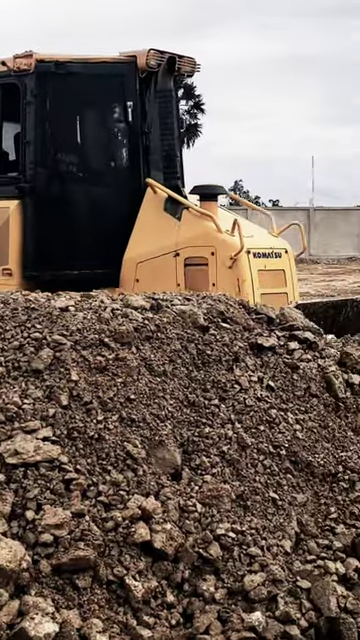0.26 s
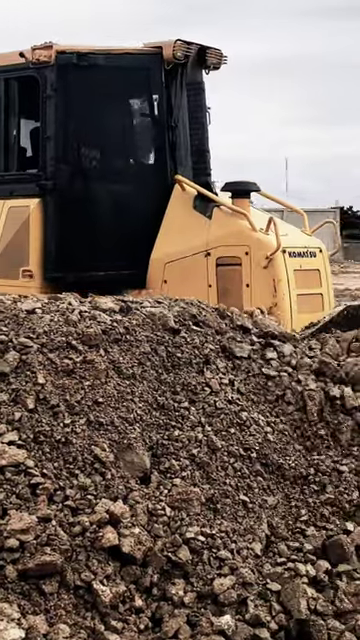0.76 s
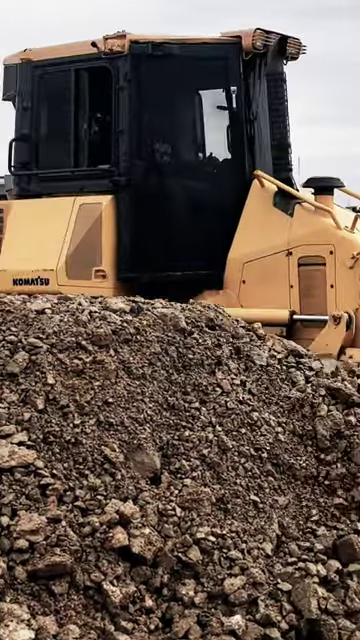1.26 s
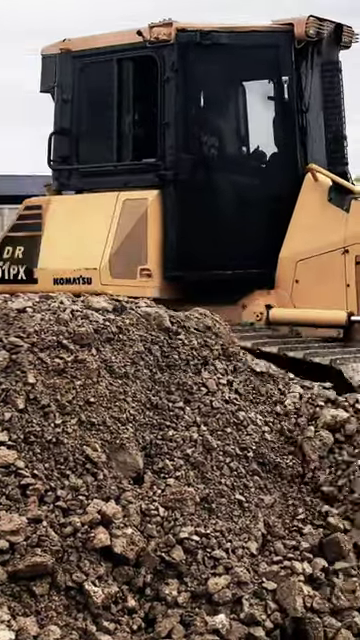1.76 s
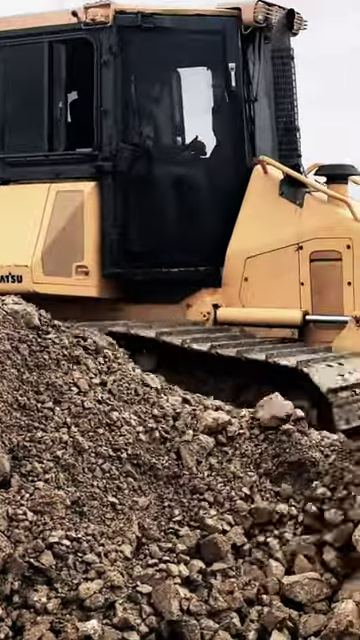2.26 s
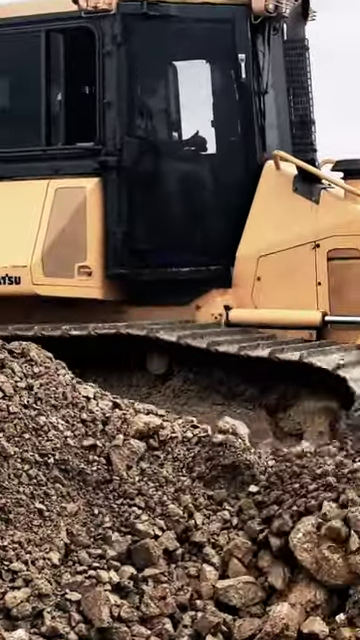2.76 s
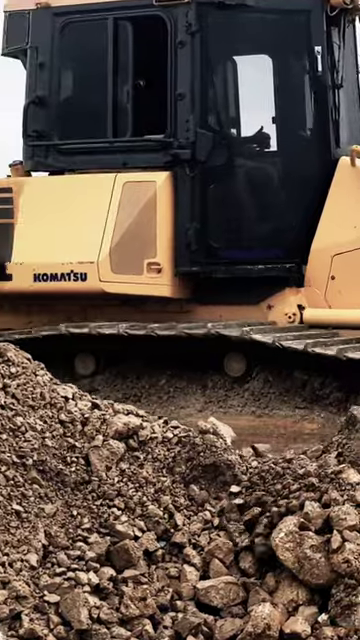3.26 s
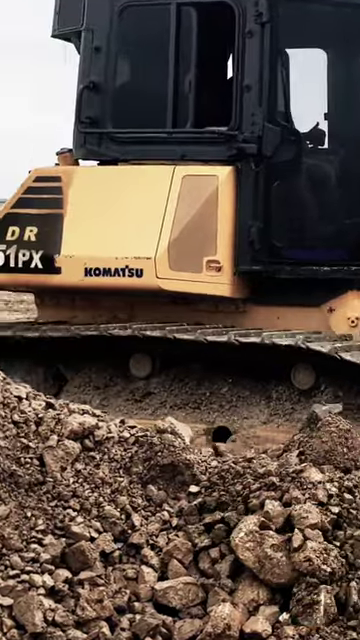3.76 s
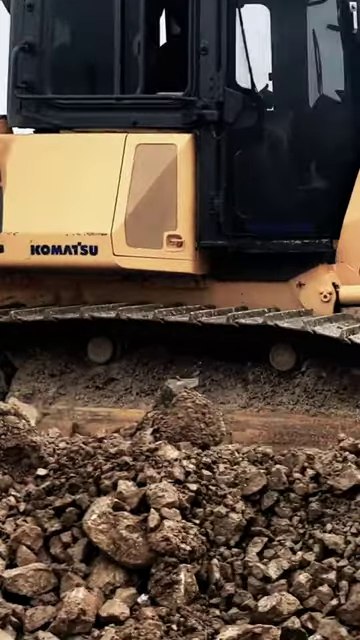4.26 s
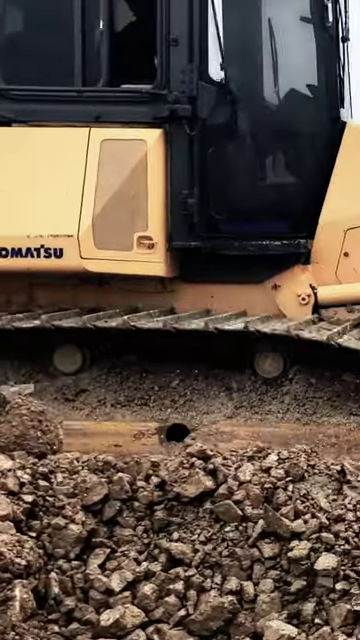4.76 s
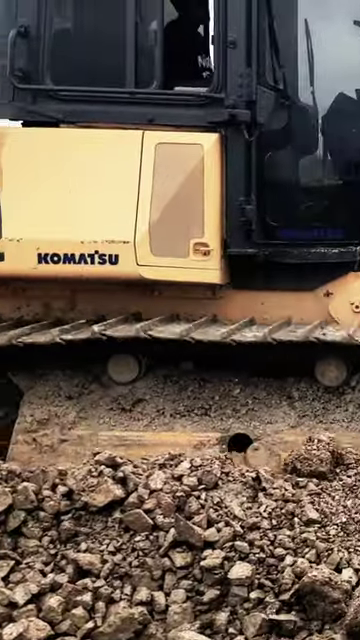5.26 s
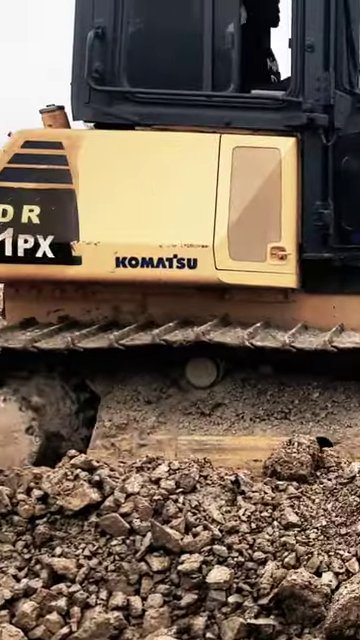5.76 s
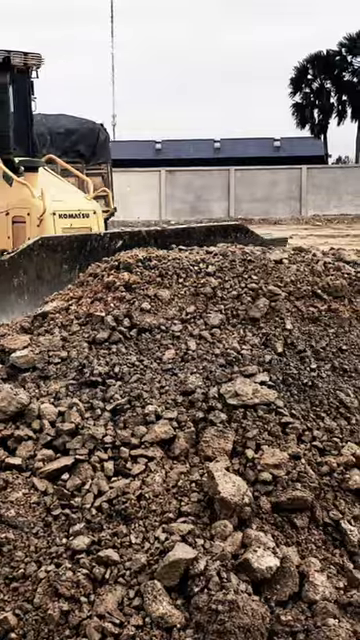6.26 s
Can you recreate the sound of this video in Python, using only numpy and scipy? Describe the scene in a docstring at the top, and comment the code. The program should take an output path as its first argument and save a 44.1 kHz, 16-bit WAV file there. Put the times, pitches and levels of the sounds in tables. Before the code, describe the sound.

Outdoors on open ground, a crawler bulldozer works close to a phone's stereo microphones. Its diesel holds a low, buzzing drone over roaring exhaust and soil noise, with metallic clatter and rattle swelling as it passes. Clods thud early, track pins give brief high squeaks in the middle, and harder knocks come later. Near the end the engine sags sharply, stumbles, then revs back up. A second engine hums faintly further off.

```python
"""Open ground: a crawler bulldozer pushes rock and soil close to a phone with two microphone ports.
Its six-cylinder diesel drones as a few harmonic lines, bogs down near the end and picks up again; coloured
noise gives roar, clatter, rattle and hiss. A turbocharger whistles thinly as a gliding sine, dry track pins
squeak as short fading tones, links knock as noise bursts through resonances, and clods rumble as decaying notes
with puffs of noise. A second engine drones further off."""
import sys
import numpy as np
from scipy import signal
from scipy.fft import rfft, irfft, next_fast_len
from scipy.io import wavfile
from scipy.ndimage import uniform_filter1d, map_coordinates

SR = 44100
rng = np.random.default_rng(int(sys.argv[2]) if len(sys.argv) > 2 else 0)


def magnitude_from_level(level_db):
    """Linear magnitude for a level in decibels (20 dB per decade)."""
    exponent = np.asarray(level_db, float) / 20
    return 10 ** exponent


def wrap_up_sound(samples):
    """Save the sound to the file named by the first command line argument, as 16-bit audio."""
    columns = np.atleast_2d(samples).T
    # keep every value between -1 and 1, then stretch to whole-number steps
    tamed = np.clip(columns, -1, 1)
    steps = np.round(tamed * 32767).astype(np.int16)
    wavfile.write(sys.argv[1], SR, steps)


N = 287973  # length [samples]


def unit(x):
    """Normalization: scales to rms 1."""
    return x / np.sqrt(np.mean(x ** 2) + 1e-20)


def along(points, hz):
    """Log-frequency interpolation of (frequency [Hz], value) points."""
    f, v = np.transpose(points)
    return np.interp(np.log(hz + 1), np.log(f + 1), v)


def curves(rows):
    """Linear interpolation in time: one value per sample for each column after the time."""
    s, *cols = np.transpose(rows)
    return [np.interp(np.arange(N) / SR, s, c) for c in cols]


def wobble(rate):
    """Band-limited fluctuation: a smooth random curve with rate knots a second."""
    return map_coordinates(rng.standard_normal(N // 20), [np.arange(N) * rate / SR], mode="wrap")


def filtered(x, response):
    """Linear filtering: the spectrum of x times a complex response of frequency."""
    m = next_fast_len(x.shape[-1] + 8192)
    spectrum = rfft(x, m) * response(np.fft.rfftfreq(m, 1 / SR))
    return irfft(spectrum, m)[..., :x.shape[-1]]


def mode(f, hz, width_hz):
    """Damped resonance: the response of one second-order mode, 1 at its peak."""
    return 1j * f * width_hz / (hz * hz - f * f + 1j * f * width_hz)


def turns(hz):
    """Phase [rad] as the running integral of a moving frequency."""
    return 2 * np.pi * np.cumsum(hz) / SR


def rush(spectrum, patchy_db, gate=1):
    """Partly coherent stereo noise: mid of rms 1, with patches of random gain, gated before its colour."""
    # left-right coherence: (frequency [Hz], likeness [0 to 1])
    likeness = [(30, 0.74), (60, 0.6), (110, 0.81), (200, 0.74), (380, 0.75), (700, 0.9), (1300, 0.88),
                (2400, 0.4), (4400, 0.11), (15000, .02)]
    z = signal.stft(rng.standard_normal((2, N + 512)), nperseg=512)[2]
    field = uniform_filter1d(rng.standard_normal(z.shape[1:]), size=6, axis=0)
    field = uniform_filter1d(field, size=8, axis=1)
    patchy = signal.istft(z * magnitude_from_level(patchy_db * unit(field)), nperseg=512)[1][:, :N]

    def colour(hz):
        angle = np.arccos(np.clip(along(likeness, hz), 0, 1)) / 2  # splits the power between mid and side
        return magnitude_from_level(along(spectrum, hz)) * [np.cos(angle), np.sin(angle)]

    mid, side = filtered(gate * patchy, colour)
    return np.array([mid + side, mid - side]) / np.std(mid)


def echoed(x):
    """Discrete reflections: a few echoes, each arriving a little differently at the two ports."""
    # echoes off ground and heap: (nominal delay [s], level against the direct sound [dB])
    walls = [(.004, -9), (.011, -7.5), (.019, -26), (.031, -21.5)]
    skew = rng.uniform(.8, 1.2, (2, len(walls)))

    def paths(f):
        echoes = [magnitude_from_level(db) * np.exp(-2j * np.pi * f * s * skew[:, k:k + 1]) for k, (s, db) in enumerate(walls)]
        return 1 + sum(echoes)

    return filtered(x, paths)


def second_drone():
    """Periodic firing further off: a fainter tone and octave that keep their own speed."""
    # second engine, unevenly fading: (time [s], tone rms level before the left-right balance [dB])
    distant = [(0, -33), (1.2, -44.5), (1.9, -34), (3.7, -41), (4.7, -44), (6.53, -52)]
    tone_db, = curves(distant)
    firing = turns(79.93 + 1.498 * wobble(1.4) + 0.71 * wobble(11))  # Hz
    tone = magnitude_from_level(tone_db + 1.1 * wobble(7)) * np.sin(firing)
    octave = magnitude_from_level(tone_db - 3 + 1.8 * wobble(12)) * np.sin(2 * firing)
    return np.sqrt(2) * (tone + octave)


def thumps():
    """Impact on soft ground: each clod lands with a short dull note of its own pitch, in a puff of grit."""
    # clods falling: (time [s], note level before its rise and decay [dB], pitch [Hz])
    clods = [(0.976, -22.5, 223), (1.009, -22.5, 298), (1.043, -26, 263), (1.123, -18, 258),
             (1.176, -26.5, 434), (1.202, -22, 320), (2.387, -21.5, 244), (4.435, -21.5, 316),
             (4.47, -47, 250), (4.564, -15, 238), (4.594, -26.5, 241), (5.619, -28, 278),
             (6.49, -25.5, 330)]
    grit_db = 9  # the puff over the note, before its narrow colour
    t = np.arange(SR // 10) / SR
    notes, grit = np.zeros((2, N + SR))
    for s, db, hz in clods:
        at = slice(round(s * SR), round(s * SR) + len(t))
        note_swell = magnitude_from_level(db - 60 * t / 0.11) * (1 - np.exp(-t / 0.0062))
        notes[at] += note_swell * np.sin(2 * np.pi * hz * t)
        grit_swell = magnitude_from_level(db + grit_db - 60 * t / 0.12) * (1 - np.exp(-t / 0.0019))
        grit[at] += grit_swell * rng.standard_normal(len(t))
    return notes[:N] + filtered(grit[:N], lambda f: mode(f, 300, 300) ** 2)


def knocks():
    """Impulsive excitation of modes: each blow rings the links, with a dull thud below and a sharp tick above."""
    # link and stone knocks, levels before envelopes and filters:
    # (time [s], ring level [dB], thud level [dB], tick level [dB])
    blows = [(0.2432, -38, -43, -52), (1.1754, -35, -33, -43.5), (1.3795, -21.5, -29, -35),
             (2.386, -25.5, -31, -43.5), (4.5077, -28, -27.5, -53), (4.8434, -53, -28, -60),
             (4.8714, -28, -21.5, -48), (4.9174, -39, -23.5, -41), (5.2523, -17, -24, -31),
             (5.5228, -19, -25.5, -33), (5.671, -29, -35, -35), (5.8818, -39, -39, -31),
             (5.9386, -50, -62, -33), (6.3824, -36, -33.5, -48)]
    # modes of the track links: (frequency [Hz], width [Hz], gain [dB])
    link_modes = [(1440, 250, 4), (2470, 79, -2), (2880, 530, -8)]
    t = np.arange(SR // 8) / SR
    ring, thud, tick = np.zeros((3, N + SR))
    for s, ring_db, thud_db, tick_db in blows:
        burst = rng.standard_normal((2, len(t)))
        at = slice(round(s * SR), round(s * SR) + len(t))
        ring[at] += magnitude_from_level(ring_db - 60 * t / 0.04) * (1 - np.exp(-t / 0.0013)) * burst[0]
        thud_hz = 760 * rng.uniform(0.94, 1.077)
        thud[at] += magnitude_from_level(thud_db - 60 * t / 0.026) * np.sin(2 * np.pi * thud_hz * t)
        tick[at] += magnitude_from_level(tick_db - 60 * t / 0.035) * burst[1]

    def links(f):  # neighbouring modes alternate in sign
        return sum((-1) ** k * magnitude_from_level(db) * mode(f, hz, w) for k, (hz, w, db) in enumerate(link_modes))

    steel = filtered(ring[:N], links) + filtered(tick[:N], lambda f: mode(f, 5600, 3400) ** 2)
    # little steel ring survives above 6300 Hz
    return thud[:N] + filtered(steel, lambda f: 1 / (1 + (f / 6300) ** 10))


def squeaks():
    """Stick-slip locked to one steel mode: a wavering, scratchy tone with its octave."""
    # squeaks of track pins and rollers: (start [s], length [s], mid pitch [Hz],
    # tone level at the start, before fade and flutter [dB], octave against the tone [dB])
    slips = [(2.114, .023, 6360, -33, -13), (2.584, .026, 6120, -42, -13), (2.723, .045, 6420, -24, -15),
             (2.77, .03, 6450, -40, -10), (2.869, .045, 6280, -35, -16), (3.08, .069, 6430, -29, -13),
             (3.115, .05, 1635, -43, -40), (3.221, .077, 1730, -42, -40), (3.343, .028, 6250, -47, -10),
             (3.431, .085, 4680, -40, -33), (3.568, .08, 5440, -39, -25), (3.74, .056, 2380, -49, -40),
             (3.785, .028, 4640, -47, -23), (3.812, .06, 2275, -45, -40), (3.82, .089, 5160, -50, -25),
             (3.924, .04, 6090, -35, -15), (3.991, .085, 5150, -52, -22), (4.045, .05, 2430, -50, -40),
             (4.05, .03, 6260, -54, -12), (4.918, .079, 6150, -35, -26), (4.93, .13, 4650, -54, -20),
             (5.02, .088, 6190, -53, -14), (5.07, .042, 4570, -48, -28), (5.339, .065, 4650, -54, -20),
             (5.387, .023, 6330, -32, -11), (5.41, .04, 6210, -34, -7), (5.45, .079, 6360, -33, -6),
             (5.465, .033, 4770, -38, -40), (5.511, .045, 4610, -48, -36), (5.54, .019, 6375, -30, -8),
             (5.571, .059, 6400, -30, -8), (5.59, .087, 4675, -54, -24), (5.703, .066, 6220, -41, -8),
             (5.785, .083, 6220, -36, -9), (5.89, .073, 6225, -54, -14), (6.361, .086, 6285, -48, -18)]
    # glide by pitch: (pitch [Hz], glide [Hz per s of listed length])
    glide = [(4700, -700), (5400, 0), (6300, 700)]
    fade_db_per_s = 57.5
    out = np.zeros(N)
    waver_hz = 32 * wobble(170) + 28 * wobble(35)
    flutter_db = 2.4 * wobble(60) + 1.8 * wobble(200)
    scratch = 1 + .14 * wobble(900)
    for start, length, hz, db, under_db in slips:
        end, octave_db = start + length, db + under_db
        i = np.arange(round((start - .006) * SR), round((end + 0.0013) * SR))
        sweep_s = np.linspace(-length / 2, length / 2, len(i))
        phase = turns(hz + along(glide, hz) * sweep_s + waver_hz[i])
        edge = signal.windows.tukey(len(i), 0.024 / (end - start + 0.012))
        fade = magnitude_from_level(-fade_db_per_s * (i / SR - start))
        tone = magnitude_from_level(db + flutter_db[i]) * np.sin(phase)
        octave = magnitude_from_level(octave_db + 1.36 * flutter_db[i]) * np.sin(2 * phase)
        out[i] += edge * fade * (tone + octave)
    return scratch * out


def turbo():
    """Tonal whistle: one thin sine, slightly unsteady in pitch and level."""
    # turbocharger: (time [s], frequency [Hz], peak level before wobble and echoes [dB])
    whistle = [(0, 11100, -74), (.7, 12050, -65), (2, 12750, -66), (2.5, 12980, -59), (3.15, 13030, -61),
               (3.9, 12550, -69), (4.5, 12300, -76), (5.6, 12300, -76), (6.53, 12800, -70)]
    hz, db = curves(whistle)
    return magnitude_from_level(db + 2 * wobble(20)) * np.sin(turns(hz + 8 * wobble(40)))


def air_hiss(rattle_db):
    """Broadband noise: air hiss that grows 1.2 dB per dB of rattle."""
    # colour of the hiss: (frequency [Hz], relative level [dB])
    hiss_colour = [(3820, -24.5), (6500, -24), (7770, -9), (8330, -10.5), (10300, -14.5), (11200, -5),
                   (12400, 2), (13900, 0), (15500, -4)]
    level_db = -57.5 + 1.2 * (rattle_db - rattle_db.mean())
    return magnitude_from_level(level_db + .9 * wobble(12)) * rush(hiss_colour, patchy_db=.4)


def roar(clatter_db):
    """Low broadband noise of exhaust and soil: it grows 0.25 dB per dB of clatter."""
    # colour of the roar: (frequency [Hz], relative level [dB])
    roar_colour = [(12, -58.5), (20, -35), (48, -14), (85, -10), (122, -11.5), (146, -8.5), (220, -14.5),
                   (250, -15.5), (310, -16.5), (405, -22.5), (520, -34.5), (800, -60)]
    # soil slides off the blade and swells the roar: (time [s], swell [dB])
    slides = [(1.14, 4), (3.9, 1), (4.52, 2.5), (6.53, 2)]
    swell_s = 0.22  # half width
    level_db = -34 + 0.25 * (clatter_db - clatter_db.mean())
    for s, db in slides:
        level_db = level_db + db * np.exp(-((np.arange(N) / SR - s) / swell_s) ** 2)
    return magnitude_from_level(level_db + 1.5 * wobble(8)) * rush(roar_colour, patchy_db=1)


def shaken_metal(firing, clatter_db, rattle_db):
    """Amplitude modulation: each firing shakes the block, so clatter and rattle pulse on the beat."""
    # colours: (frequency [Hz], relative level [dB])
    clatter_colour, rattle_colour = [(250, -27.5), (430, -7), (522, -4), (632, 0), (767, -0.5), (878, -3.5),
                                     (1030, -14), (1500, -8), (1670, -12.5), (2000, -28.5), (2600, -40),
                                     (4400, -120)], [(1120, -26.5), (1900, -0.5), (2550, -3), (2820, -0.5),
                                                      (3240, -5), (3570, -3), (3900, -4.5), (5790, -5),
                                                      (7500, -16.5), (9750, -45.5), (16500, -120)]
    beat = 1 + 0.064 * np.cos(firing + 0.76) * (1 + 0.39 * wobble(40))
    shake_db = 0.41 * wobble(14)  # shared by both
    clatter_gain = magnitude_from_level(clatter_db + shake_db + 0.77 * wobble(35))
    rattle_gain = magnitude_from_level(rattle_db + 0.91 * shake_db + 0.87 * wobble(16))
    clatter = clatter_gain * rush(clatter_colour, patchy_db=1.2, gate=beat)
    return clatter + rattle_gain * rush(rattle_colour, patchy_db=1.35, gate=beat)


def firing_drone(firing, tone_db, octave_db, ragged):
    """Harmonic series of the cycle: strong firing lines, weaker lines between from unequal cylinders."""
    # unequal cylinders: (multiple of the cycle rate, rms level while the firing tone is at -17 dB [dB])
    uneven = [(4, -48), (5, -48), (7, -39), (8, -47.5), (9, -39), (11, -42.5), (18, -48)]
    drone = magnitude_from_level(tone_db + (0.6 + 1.7 * ragged) * wobble(25)) * np.sin(firing)
    drone = drone + magnitude_from_level(octave_db + (1.5 + 2 * ragged) * wobble(25)) * np.sin(2 * firing - np.pi / 5)
    drone = drone + magnitude_from_level(octave_db - 26 + 3 * wobble(9)) * np.sin(6 * firing)
    load_db = .5 * (tone_db + 17)  # the lines between swell with load, half as fast
    for k, db in uneven:
        phase = k * firing / 6 + rng.uniform(0, 2 * np.pi)  # six firings a cycle
        drone = drone + magnitude_from_level(db + load_db + 1.3 * wobble(6)) * np.sin(phase)
    return np.sqrt(2) * drone


def engine():
    """Periodic combustion: one firing phase drives the drone and the beat of the metal, over roar and hiss."""
    # (time [s], firing rate [Hz], firing tone rms level [dB], its octave's rms level [dB])
    combustion = [(0.0, 100.4, -20, -34), (.4, 99.7, -20, -37), (.9, 101.6, -16.5, -36.5),
                  (1.22, 101.4, -18, -40.5), (1.35, 98.2, -21, -30), (1.85, 93.84, -17, -33),
                  (2.51, 99.0, -18.5, -28.5), (3.22, 102.7, -15.5, -34.5), (3.76, 103, -17.5, -28),
                  (4.16, 105.4, -18, -38.5), (5.4, 107.9, -22.5, -33), (5.49, 95.95, -39.5, -32.5),
                  (5.75, 66.07, -36, -37.5), (5.91, 57.64, -56, -37.5), (5.99, 67.25, -22, -34),
                  (6.07, 85.8, -22, -26.5), (6.17, 93.05, -24.5, -22.5), (6.29, 88.24, -23.5, -25),
                  (6.38, 90, -25.5, -43), (6.46, 99.2, -28.5, -49), (6.53, 101.4, -17, -38)]
    # the machine rolls past: (time [s], engine clatter level [dB], track rattle level [dB])
    passing = [(0.0, -42, -52), (1.2, -41.5, -52), (2.36, -39, -49.5), (2.87, -37, -47.5),
               (3.86, -38.5, -50.5), (4.56, -38.5, -47), (5.05, -41, -53.5), (5.38, -38, -51.5),
               (5.82, -48, -58.5), (6.07, -47, -55.5), (6.53, -40.5, -58.5)]
    firing_hz, tone_db, octave_db = curves(combustion)
    clatter_db, rattle_db = curves(passing)
    ragged = np.clip((-23.5 - tone_db) / 14, 0, 1)  # off load the firing stumbles
    firing = turns(firing_hz * (1 + (0.0037 + .08 * ragged) * wobble(30)))
    firing = firing + [[.5], [-.5]] * (.3 * wobble(1.2))  # the moving machine shifts the phase between the ports
    noise = air_hiss(rattle_db) + roar(clatter_db) + shaken_metal(firing, clatter_db, rattle_db)
    return noise + firing_drone(firing, tone_db, octave_db, ragged)


def scene():
    """Superposition: all sources summed at the two microphone ports, left and right."""
    distant = second_drone() * magnitude_from_level([[-3], [3]])
    clods = thumps() * magnitude_from_level([[-1.5], [1.5]])
    reflected = echoed(knocks() + squeaks() + turbo())
    return distant + clods + reflected + engine()


def top_cut(x):
    """Nothing passes above the cut-off."""
    return signal.sosfilt(signal.butter(12, 15690, fs=SR, output="sos"), x)


def record(dry):
    """Interchannel level and phase differences: the ports differ in both and stop at a band limit."""
    # (frequency [Hz], left minus right [dB])
    lean = [(35, -2), (70, 1.6), (200, 1.8), (330, .5), (740, 4.5), (2000, 1.5), (3300, 2.5), (9000, .5)]
    # (frequency [Hz], phase by which left leads [rad])
    lead = [(2500, 0), (3600, .8), (4700, -.5), (6500, 1.1), (9000, -2.5), (11500, -1.2)]
    top_hz = 15590
    sign, margin = np.array([[1], [-1]]), 2048  # left and right; samples
    # an odd reflection carries the sound on past both ends
    extended = np.pad(dry, ((0, 0), (margin, margin)), "reflect", reflect_type="odd")

    def port(hz):
        gain = magnitude_from_level(sign * along(lean, hz) / 2)
        return (hz < top_hz) * gain * np.exp(.5j * sign * along(lead, hz))

    mix = filtered(extended, port)[:, margin:-margin]
    return top_cut(mix)


dry = scene()
out = record(dry)
wrap_up_sound(out)
```